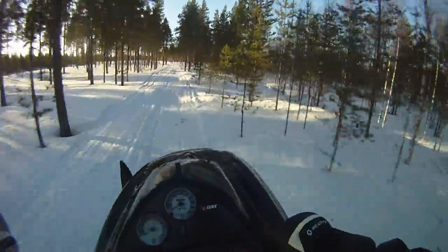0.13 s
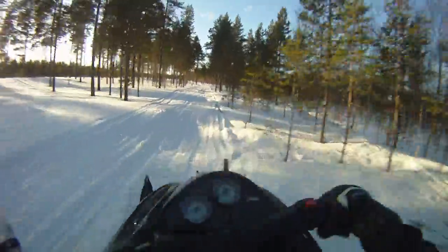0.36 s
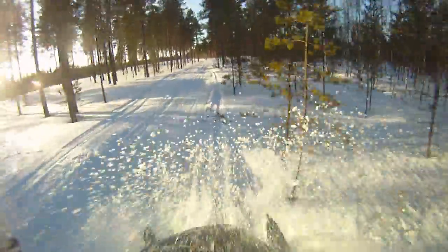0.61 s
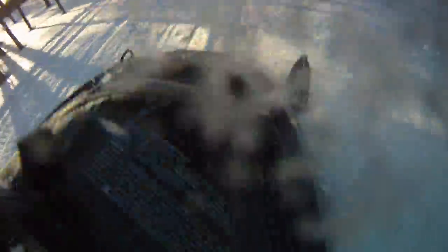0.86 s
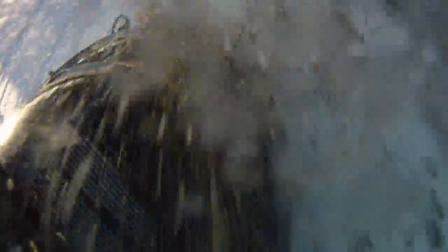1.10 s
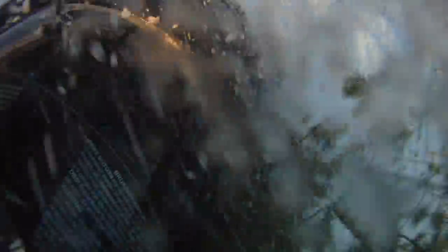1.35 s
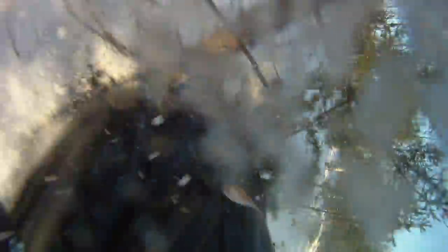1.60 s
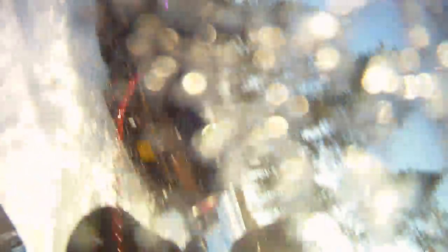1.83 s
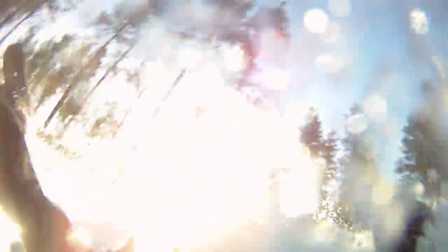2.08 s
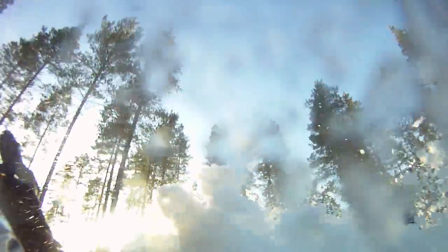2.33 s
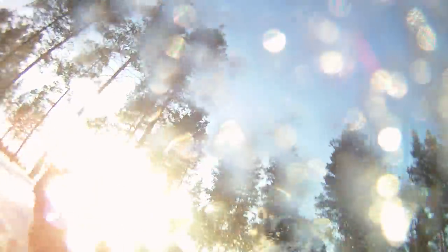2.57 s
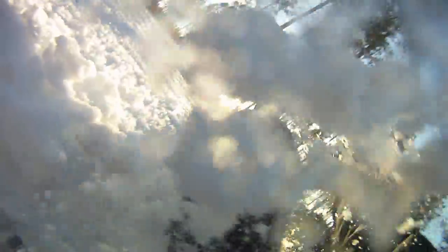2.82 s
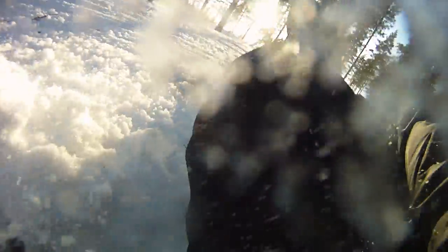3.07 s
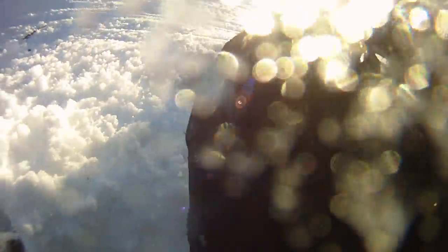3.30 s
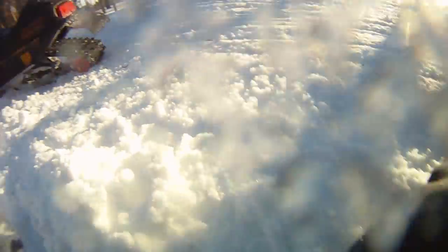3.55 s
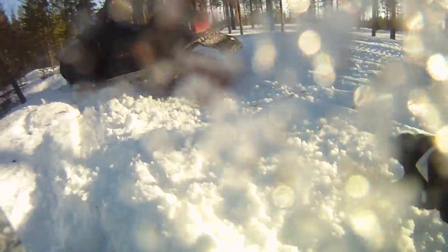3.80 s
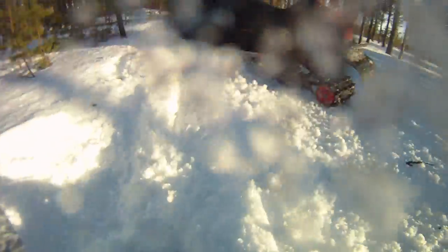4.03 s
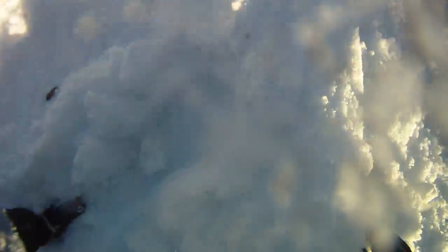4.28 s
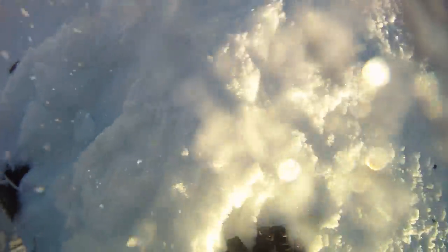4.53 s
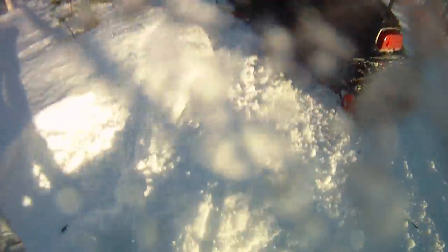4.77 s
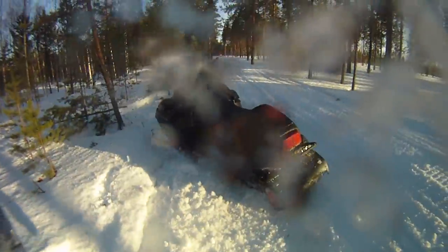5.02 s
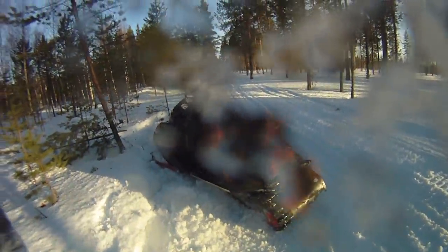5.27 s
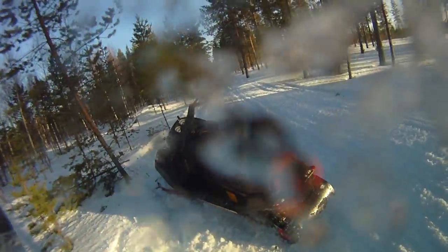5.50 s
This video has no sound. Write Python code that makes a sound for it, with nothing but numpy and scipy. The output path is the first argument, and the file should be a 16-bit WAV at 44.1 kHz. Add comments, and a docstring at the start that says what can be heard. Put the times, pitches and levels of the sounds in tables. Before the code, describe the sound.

A muffled, boxy, distorted close perspective in snowy woods. A raspy two-cylinder engine revs over low wind rumble and breaks off as the rider crashes. Twigs, snow and gear rap and drag across the plastic case with heavy bumps beneath. The scraping fades to light rustles and ticks, leaving soft low rumble and slow sputtering idle puffs.

```python
"""Snowmobile rollover heard from a helmet

A microphone in a sealed plastic case on a helmet rides a snowmobile that leaves the trail and rolls in deep snow.
Knocks and scrapes of twigs, snow and gear are noise bursts and crackling hiss ringing the modes of the case.
The engine, gated hiss and firing pulses, breaks off at the first blow. Wind and jolts shake the mount:
a wandering low tone, gusts of noise and soft thuds. At the end slow puffs idle a few metres off."""
import sys
import numpy as np
from scipy import signal
from scipy.fft import rfft, irfft, next_fast_len
from scipy.io import wavfile

SR = 44100
rng = np.random.default_rng(int(sys.argv[2]) if len(sys.argv) > 2 else 0)


def transcribe(signal):
    """Save signal, clipped to [-1, 1], as a 16-bit WAV file at the path in sys.argv[1]."""
    frames = np.atleast_2d(signal).T
    limited = np.clip(frames, -1, 1)
    pcm = np.round(limited * 32767).astype(np.int16)
    wavfile.write(sys.argv[1], SR, pcm)


def linear_from_db(decibels):
    """Turn decibels (scalar or array-like) into linear amplitude factors; 0 gives 1."""
    return 10 ** (np.asarray(decibels, float) / 20)


N = 248283


def rms_one(x):
    """Scale to unit power."""
    return x / np.sqrt(np.mean(x ** 2) + 1e-20)


def in_time(rows):
    """Turn the columns after the time into sample-by-sample curves, straight between the points."""
    s, *columns = np.transpose(rows)
    return [np.interp(np.arange(N) / SR, s, column) for column in columns]


def coloured(x, spectrum):
    """Filter x by a spectrum of (frequency [Hz], level [dB]) points; rms 1."""
    size = next_fast_len(N)
    hz, level_db = np.transpose(spectrum)
    bins_hz = np.fft.rfftfreq(size, 1 / SR)
    gain = linear_from_db(np.interp(np.log(bins_hz + 1), np.log(hz), level_db))
    return rms_one(irfft(rfft(x, size) * gain, size)[:N])


def resonate(x, hz, width_hz):
    """A single resonance: two poles, with gain near 1 on top."""
    r = np.exp(-np.pi * width_hz / SR)
    zeros = [(1 - r * r) / 2, 0, (r * r - 1) / 2]
    poles = [1, -2 * r * np.cos(2 * np.pi * hz / SR), r * r]
    return signal.lfilter(zeros, poles, x + 1e-18)


def drift(rate_hz):
    """Slow random wander of rms 1: noise through two equal low-passes."""
    r = np.exp(-2 * np.pi * rate_hz / SR)
    slow = signal.lfilter([1], [1, -2 * r, r * r], rng.standard_normal(N + SR))
    return rms_one(slow[SR:])   # the first second lets the filter settle


def grains(per_s, spread_db):
    """Random tiny contacts of uneven size and either sign."""
    sizes = linear_from_db(spread_db * np.minimum(rng.exponential(1, N), 4)) * rng.choice([-1, 1], N)
    return sizes * (rng.random(N) < per_s / SR)


def thud(rows, cycles):
    """A soft push and its rebound, dying within a few cycles; rows of (time [s], peak [dB], pitch [Hz])."""
    out = np.zeros(N + SR)
    for s, level_db, hz in rows:
        turns = np.arange(round(6 * SR / hz)) * hz / SR
        soft_start = np.sin(np.pi * np.minimum(turns, .5))
        wave = soft_start * np.sin(2 * np.pi * turns) * np.exp(-turns / cycles)
        at = round(s * SR)
        out[at:at + len(wave)] += linear_from_db(level_db) * wave / np.abs(wave).max()
    return out[:N]


# Knocks on the case: (time [s], peak level [dB], favoured pitch [Hz])
KNOCK_HITS = [(0.393, 3, 1150), (0.522, -3, 1410), (0.636, -6, 1880), (0.708, 8, 2220), (0.723, -8, 1280),
              (0.736, -3, 3050), (0.748, -8, 1530), (0.771, 2, 1030), (0.785, -10, 2900),
              (0.798, -3.5, 2150), (0.815, -1.5, 1610), (0.837, -5, 3065), (0.88, -4, 2020),
              (0.973, -4.5, 3060), (1.024, 4, 2920), (1.081, 0.5, 3180), (1.115, -1, 3300),
              (1.126, 2.5, 2850), (1.141, 3.5, 2900), (1.164, 2, 2450), (1.188, 6.5, 2100),
              (1.206, -1.5, 2280), (1.239, -2.5, 950), (1.383, -11.5, 1700), (1.445, -15.5, 2730),
              (1.514, -2.5, 1110), (1.522, 1.5, 1720), (1.558, -1.5, 2300), (1.593, -2, 1950),
              (1.716, -16, 1780), (1.733, 5.5, 2910), (1.838, -6.5, 1160), (1.955, -7, 1260),
              (1.977, 1.5, 1810), (2.048, -7, 1580), (2.204, 5.5, 2060), (2.246, -8, 3550),
              (2.284, 7.5, 3740), (2.314, -12, 1970), (2.38, -13.5, 2000), (2.476, -9, 1780),
              (2.494, -9.5, 1820), (2.58, -12, 1410), (2.716, -20, 1110), (2.802, 3.5, 2100),
              (2.831, 6, 1930), (2.848, -0.5, 2400), (2.93, -7.5, 2300), (2.959, -4, 1650),
              (2.973, 5, 2400), (2.985, -14, 1430), (3.023, -7, 2800), (3.031, 7.5, 1745),
              (3.06, 4.5, 2230), (3.08, -2, 2050), (3.144, -9.5, 2100), (3.203, -10, 1930),
              (3.232, -11.5, 1350), (3.29, -10, 1770), (3.433, -11, 1090), (3.477, -12, 2070),
              (3.5, -10.5, 1330), (3.557, 10, 2050), (3.567, -5.5, 2050), (3.606, -12, 1980),
              (3.624, -10, 1830), (3.685, -15, 2050), (4.34, -14.5, 2110), (4.353, 3.5, 2950),
              (4.361, 11, 2190), (4.386, -12, 2530), (4.418, -7, 2500), (4.461, -15, 2720),
              (4.626, -13.5, 3340), (4.703, -16, 2800), (4.726, -12.5, 3740), (4.795, -15, 2540),
              (4.925, -22, 3000), (4.982, -22.5, 3580)]


def knocks():
    """Each knock is a short rough contact that favours the case modes near its pitch; hard ones last longer."""
    hard_spread = 1   # dB by which the floor under the far modes rises per dB of a hard knock
    t = np.arange(round(.03 * SR)) / SR
    out = np.zeros(N + SR)
    rough = rng.standard_normal((len(KNOCK_HITS), len(t)))
    mode_hz = np.array(CASE_MODES)[:, 0]
    for (s, level_db, pitch_hz), noise in zip(KNOCK_HITS, rough):
        length_s = 0.0032 + 0.00031 * min(linear_from_db(level_db), 2)
        attack = np.minimum(t / 0.0009, 1)
        decay = np.exp(-(t / length_s) ** 2) + 0.098 * np.exp(-t / 0.0069)
        # dull knocks are soft contacts
        softness = signal.butter(2, min(1.7 * pitch_hz, 6000), fs=SR)
        contact = signal.lfilter(*softness, noise * attack * decay)
        octaves_off = np.abs(np.log2(mode_hz / pitch_hz))
        most_cut_db = 20 - hard_spread * max(level_db, 0)
        near = linear_from_db(-np.minimum(14 * octaves_off, most_cut_db))
        ring = near @ np.array(case_rings(contact, widen=1.7))
        at = round(s * SR)
        out[at:at + len(t)] += linear_from_db(level_db) * ring / np.abs(ring).max()
    return out[:N]


# Modes the case rings with: (frequency [Hz], width before widening [Hz], relative level [dB])
CASE_MODES = [(260, 168, -9.5), (770, 252, -3), (1223, 128, 5.5), (1650, 174, 2.5), (2010, 298, 3),
              (2400, 240, 3.5), (3395, 600, 1), (4280, 515, 2.5), (4705, 190, 3.5), (5480, 450, 0)]


def case_rings(x, widen):
    """The sound of x in each mode of the case, signs alternating."""
    rings = []
    for k, (hz, width_hz, level_db) in enumerate(CASE_MODES):
        rings.append((-1) ** k * linear_from_db(level_db) * resonate(x, hz, widen * width_hz))
    return rings


def rubbing():
    """Snow, twigs and cloth: a crackle of small contacts over a hiss, through the low and the high modes of the case."""
    dull, bright, grit = strokes()
    fade = np.exp(-1 / (0.00069 * SR))   # each contact dies with a time constant of 0.69 ms
    crackle = rms_one(signal.lfilter([1], [1, -fade], np.abs(grains(260, spread_db=5.6))))
    texture = 1 - .88 * grit + grit * crackle
    rub = rng.standard_normal(N) * texture * linear_from_db(3 * drift(14))
    rings = case_rings(rub, widen=1.08)
    return dull * rms_one(sum(rings[:6])) + bright * rms_one(sum(rings[6:]))


# Snow, twigs and cloth dragged over the case: (start [s], length [s], dull level [dB],
# bright level over the dull [dB], share of separate contacts [0-1])
DRAG_STROKES = [(0.453, 0.5, -31.5, -4.5, 0.28), (0.678, 0.18, -18, -1.5, 0.97),
                (0.988, 0.17, -18.5, 1.5, 0.59), (1.175, 0.033, -15, -2.5, 0.5),
                (1.219, 0.086, -28.5, -6.5, .8), (1.365, 0.017, -32, -2, 0.3),
                (1.5, 0.016, -18.5, -12, 0.5), (1.532, 0.038, -17, -6.5, 0.08),
                (1.782, 0.0099, -23, -13, 1), (1.842, 0.037, -25, -15, 0.4),
                (1.961, 0.088, -14.5, -17.5, 0.13), (2.063, .16, -22, -14.5, 0.41),
                (2.251, 0.055, -22, -3, 0.73), (2.312, 0.096, -38, -7, 1), (2.68, 0.2, -31.5, -12.5, 0.5),
                (2.897, 0.12, -28.5, -0.5, 0.65), (3.137, 0.25, -33, -8, 0.51),
                (3.401, 0.18, -32.5, -11, 0.67), (3.542, 0.13, -31, -6, 0.7), (4.392, 0.11, -41, 6, 0.5),
                (4.518, 0.34, -40, -2, 0.84), (4.84, .15, -47.5, -1, .9)]
# Faint rustle between the strokes: (time [s], dull level [dB])
FAINT_RUSTLE = [(0, -35), (.9, -33.5), (1.49, -41), (1.63, -57), (1.93, -33.5), (2.43, -43), (2.56, -38),
                (3.11, -46.5), (3.72, -41.5), (3.88, -51), (4.08, -48.5), (4.33, -54), (5.63, -60)]


def strokes():
    """Each stroke swells, holds and dies fast; gives the dull gain, the bright gain and the share of grit."""
    attack_s, release_s = 0.013, .008
    rustle_bright_db, rustle_grit = -7.5, 0.43
    t = np.arange(N) / SR
    # dull and bright add up as powers, grit as a share weighted by dull power
    dull = linear_from_db(in_time(FAINT_RUSTLE)[0]) ** 2
    bright = dull * linear_from_db(rustle_bright_db) ** 2
    grit = dull * rustle_grit
    for s, length, level_db, bright_db, share in DRAG_STROKES:
        swell = np.clip((t - s) / attack_s, 0, 1)
        shape = swell * np.exp(-np.maximum(t - s - length, 0) / release_s)
        power = (linear_from_db(level_db) * shape) ** 2
        dull = dull + power
        bright = bright + power * linear_from_db(bright_db) ** 2
        grit = grit + power * share
    return np.sqrt(dull), np.sqrt(bright), np.clip(grit / dull, 0, 1)


# Engine under load: (time [s], mean firing rate [1/s], level of the rasp [dB])
ENGINE_LOAD = [(0, 114, -35), (.12, 108, -23.5), (.385, 139, -16), (.402, 140, -28), (.5, 120, -57.5)]


def engine():
    """Two cylinders fire unevenly; each firing gives a pulse and gates the hiss of exhaust and track."""
    per_s, level_db = in_time(ENGINE_LOAD)
    turns = np.cumsum(per_s * (1 + 0.033 * drift(25))) / SR   # one turn per firing
    cylinder = linear_from_db(1.8 * (turns // 1 % 2))   # every other firing is 1.8 dB stronger
    pulses = rms_one(np.diff(turns // 1, prepend=0) * cylinder)
    gate = 1 + np.exp(-3.0 * (turns % 1)) * cylinder
    hiss = rms_one(rng.standard_normal(N) * gate * linear_from_db(2 * drift(31)))
    rasp = resonate(sum(case_rings(hiss, widen=1.3)), 1650, 1200)   # the rasp peaks in the middle
    source = hiss + .6 * pulses
    drone = resonate(source, 200.5, 170)   # the lows pass straight through the case wall
    return linear_from_db(level_db) * (rms_one(rasp) + linear_from_db(-11) * rms_one(drone))


# Jolts of the whole helmet: (time [s], peak level [dB], pitch [Hz])
HELMET_JOLTS = [(.393, -8, 54), (.515, -10, 60.4), (1.185, -7, 117), (1.242, -10.5, 75.6), (1.515, 2, 74.2),
                (1.962, -5.5, 71.5), (2.048, -6.5, 70), (2.715, -14, 52.6), (2.845, -15.5, 50.7),
                (3.235, -21.5, 45), (3.430, -8, 53)]


def jolts():
    """The whole helmet is pushed and rebounds as low, heavily damped thuds."""
    return thud(HELMET_JOLTS, cycles=.75)


# Spectrum of the gusts: (frequency [Hz], relative density [dB per Hz])
GUST_SPECTRUM = [(45, -27.5), (75, 3), (150, -4.5), (250, -18), (500, -33), (900, -46)]
# The gusts ease as the machine stops: (time [s], gain before the swing's share [dB])
GUST_GAIN = [(2.2, -21), (2.4, -22), (3.6, -21), (3.9, -28.5), (5.6, -35)]


def mount():
    """Wind and head movement keep the mount's low mode swinging at a wandering pitch; lumpy gusts lie above it."""
    centre_hz = 37.9
    gust_follows = 0.53   # share of the swing's level changes, in dB, that the gusts follow
    height = bumps()
    gust_gain_db = in_time(GUST_GAIN)[0]
    pitch_hz = centre_hz * (1 + 0.12 * drift(5.02))
    tone = np.sqrt(2) * np.sin(2 * np.pi * np.cumsum(pitch_hz) / SR)
    swing = tone * linear_from_db(3.5 * drift(9.8))
    gusts = coloured(rng.standard_normal(N) * linear_from_db(4.1 * drift(27)), GUST_SPECTRUM)
    return height * swing + height ** gust_follows * linear_from_db(gust_gain_db) * gusts


# Bumps that set the mount swinging: (time of the crest [s], mean swing level [dB])
MOUNT_BUMPS = [(0, -20), (0.221, -25.5), (0.369, -16.5), (.52, -18), (.68, -18), (.89, -23), (1.04, -21.5),
               (1.3, -20), (1.46, -22.5), (1.62, -26.5), (1.901, -17.5), (2.1, -22.5), (2.24, -25.5),
               (2.551, -27.5), (2.74, -25), (2.95, -30), (3.26, -45), (3.462, -21), (3.84, -29.5),
               (4.051, -31.5), (4.29, -27), (4.589, -27.5), (4.719, -24.5), (5.439, -26)]


def bumps():
    """Swing of the mount: each bump builds up and dies away at shared rates over a calm level."""
    rise_db_per_s, fall_db_per_s, calm_db = 143, 132, -44.5
    t = np.arange(N) / SR
    each = [db - np.maximum(rise_db_per_s * (s - t), fall_db_per_s * (t - s)) for s, db in MOUNT_BUMPS]
    return linear_from_db(np.maximum(np.max(each, axis=0), calm_db))


# Faint narrow hiss: (time [s], gain on the summed bands [dB])
HISS_GAIN = [(4.9, -59.5), (5.02, -53), (5.48, -48.5), (5.56, -46.5)]
# Bands of that hiss: (frequency [Hz], width of the narrower of two resonances [Hz], relative level [dB])
HISS_BANDS = [(1720, 62, -4), (1950, 100, -8.5), (2730, 100, -15)]


def idle():
    """Slow uneven exhaust puffs from cycles that fire or miss by chance, and a faint hiss in narrow bands."""
    from_s, cycle_s, jitter_s = 3.82, 0.047, .006
    fires = 0.54   # share of cycles that fire
    chance = rng.random((40, 3))   # timing, size and luck of each cycle
    starts = from_s + cycle_s * np.arange(40) + jitter_s * (2 * chance[:, 0] - 1)
    fired = []
    for s, (_, size, luck) in zip(starts, chance):
        if luck < fires and s < N / SR:
            fired.append((s, 6 * (size - .5), 200))
    puffs = linear_from_db(-36.5) * thud(fired, cycles=0.2)
    noise = rng.standard_normal(N)
    hiss = np.zeros(N)
    for hz, width_hz, level_db in HISS_BANDS:
        band = resonate(resonate(noise, hz, width_hz), hz, 2 * width_hz)
        hiss += linear_from_db(level_db) * rms_one(band)
    return puffs + linear_from_db(in_time(HISS_GAIN)[0]) * hiss


def scene():
    """One microphone feeds both channels."""
    mono = knocks() + rubbing() + mount() + jolts() + engine() + idle()
    return np.tile(mono, (2, 1))


def low_pass(x):
    """Removes everything above the highest recorded frequency."""
    return signal.sosfilt(signal.butter(12, 16400, fs=SR, output="sos"), x)


def record(dry):
    """Sampled at 12 kHz, clipped, each sample held for four steps of 48 kHz: the spectrum mirrors about 6 and 12 kHz."""
    dry = signal.sosfilt(signal.butter(6, 5600, fs=SR, output="sos"), dry)
    slow = np.clip(signal.resample_poly(dry, 40, 147, axis=1), -.95, .95)   # 44.1 to 12 kHz
    stairs = np.repeat(slow, 4, axis=1)
    held = signal.resample_poly(stairs, 147, 160, axis=1)[:, :N]   # 48 to 44.1 kHz
    held = np.pad(held, ((0, 0), (0, N - held.shape[1])))
    held = signal.sosfilt(signal.cheby2(10, 40, 15900, fs=SR, output="sos"), held)
    return low_pass(np.clip(held, -1, 1))


dry = scene()
out = record(dry)
transcribe(out)
```